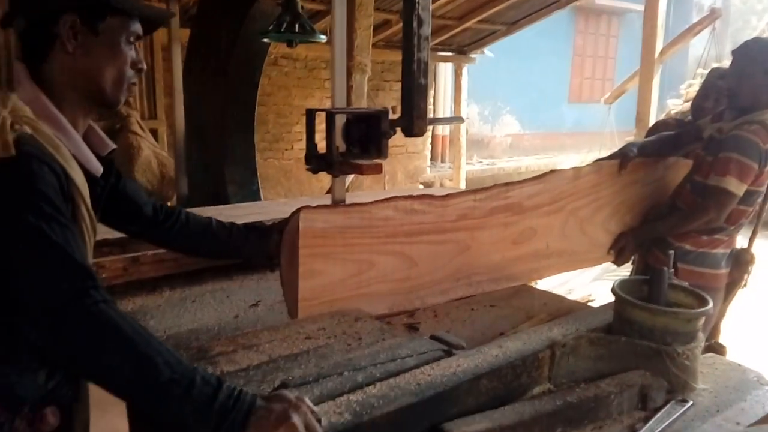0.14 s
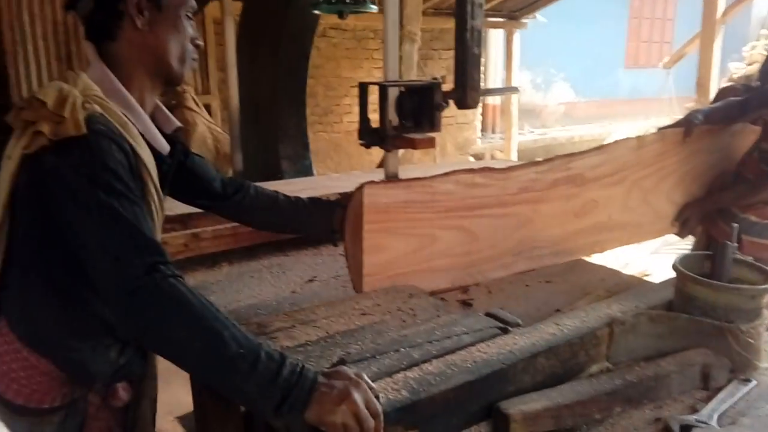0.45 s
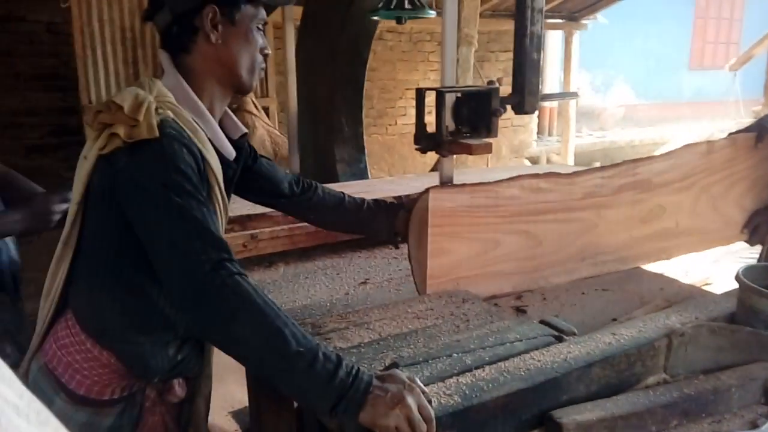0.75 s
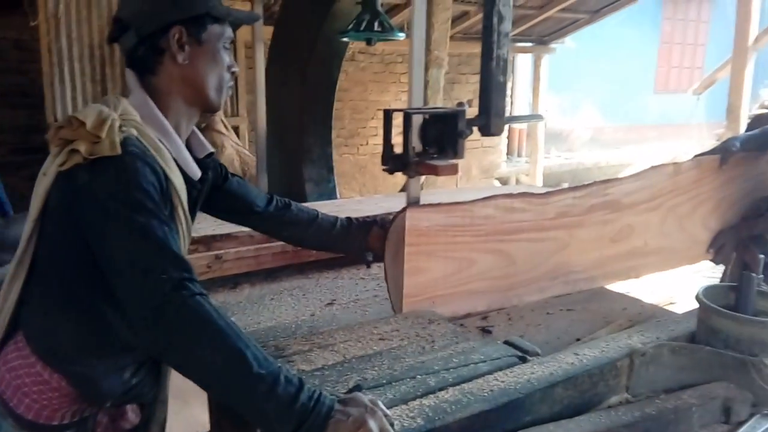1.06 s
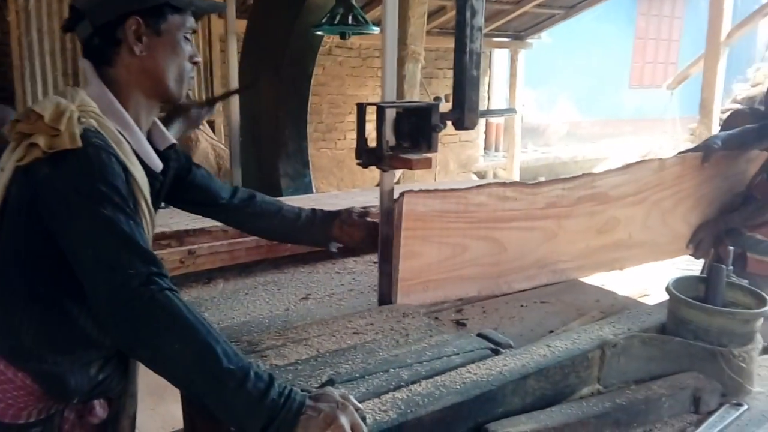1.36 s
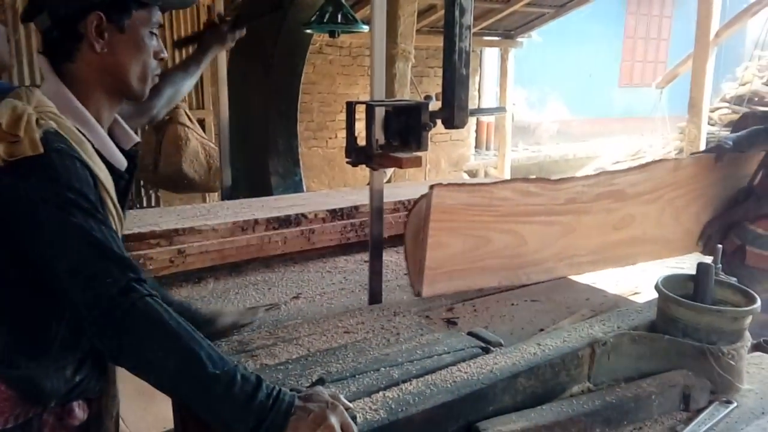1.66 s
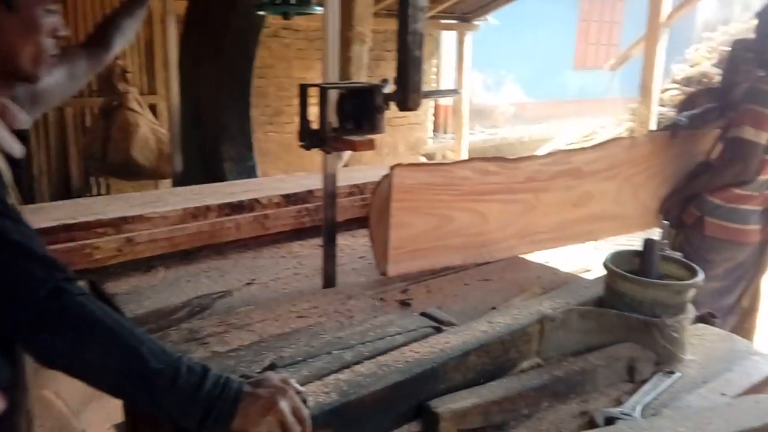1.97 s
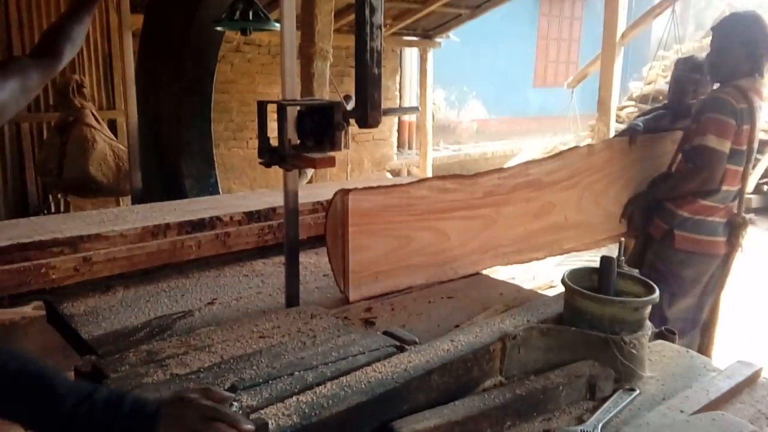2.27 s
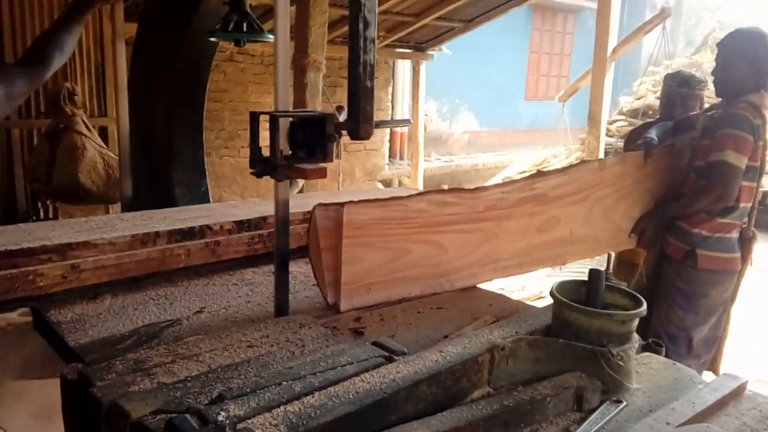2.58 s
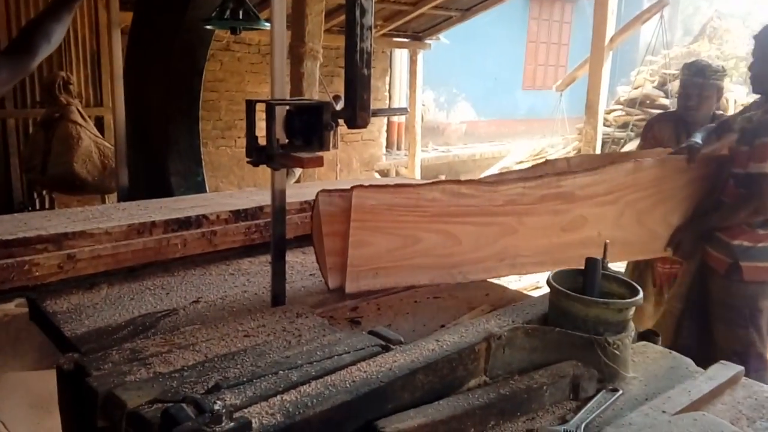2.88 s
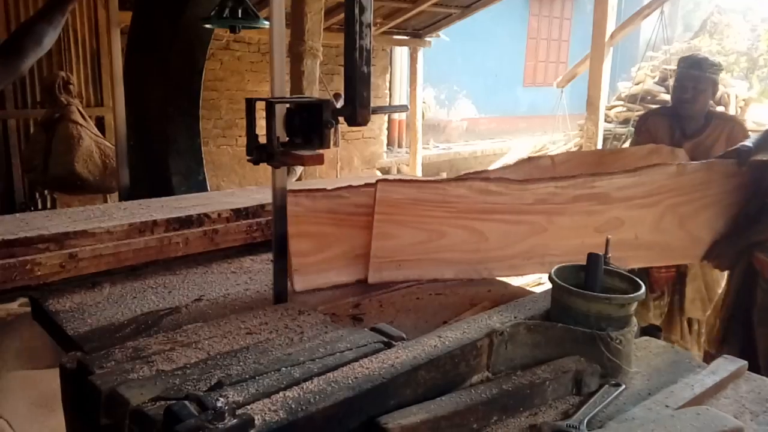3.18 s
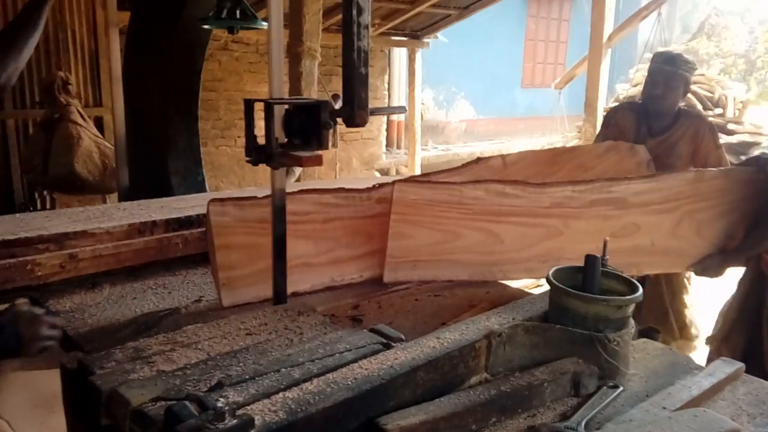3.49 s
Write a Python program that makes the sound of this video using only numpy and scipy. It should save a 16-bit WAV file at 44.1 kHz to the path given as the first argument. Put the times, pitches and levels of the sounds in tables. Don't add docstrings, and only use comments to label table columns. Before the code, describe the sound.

Big sawmill band saw roars and shrieks steadily, biting through wood until the blade pings free

```python
import sys
import numpy as np
from scipy import signal
from scipy.fft import rfft, irfft, next_fast_len
from scipy.io import wavfile
from scipy.ndimage import uniform_filter1d, map_coordinates

SR = 44100
rng = np.random.default_rng(int(sys.argv[2]) if len(sys.argv) > 2 else 0)


def boost(x):
    u = np.asarray(x, float) / 20
    return 10 ** u


def put_to_file(sound):
    columns = np.atleast_2d(sound).T
    safe = np.clip(columns, -1, 1)
    whole_steps = np.round(safe * 32767)
    wavfile.write(sys.argv[1], SR, whole_steps.astype(np.int16))


N = 160965

# t/s, level/dB
RUN = [
    (0, -15.5),
    (1.2, -15.5),
    (1.8, -15),
    (2.4, -16.5),
    (3.65, -14.5),
]
# lower edge f/Hz, edge sharpness f/Hz, reach upward f/Hz,
# steepness of the upper end, level/dB, sway level/dB
FAMILIES = [(478, 14, 170, 1.55, -23, 1), (1116.4, 16, 268, 4.4, -11.5, 0.5), (1810, 11, 340, 1.2, -19, 2),
            (2112, 53, 147, 1.6, -18.5, 3.5), (3287, 23, 640, 0.85, -2.5, 0.52),
            (4114, 25, 250, 3.8, -12.5, 1.5), (5260, 110, 690, 0.79, -12.5, 5),
            (6270, 170, 970, 1.2, -10.5, 0.1), (9150, 65, 550, 1.1, -28.5, 2)]
# f/Hz, width f/Hz, cutting level/dB, free level/dB
MODES_OF_BAND = [(301, 15, -58, -65.5), (411, 25, -59, -55), (945.4, 36, -44, -40.5),
                 (1276, 32, -33.5, -35), (1428, 8.5, -42, -53), (1851, 36, -41, -42),
                 (2210, 38, -40.5, -35.5), (2790, 19, -43, -43), (3380, 69, -46, -27), (3920, 40, -36, -28),
                 (5666, 60, -31, -43), (6230, 53, -39, -49), (6830, 45, -43, -47), (9080, 280, -42, -55)]
BAND_DB, MOST_SWAY_DB = -1, 1.3


def band():
    families = np.zeros(N)
    for edge_hz, sharp_hz, reach_hz, steep, db, sway_db in FAMILIES:
        def family_shape(f):
            rise = 1 / (1 + np.exp(np.clip((edge_hz - f) / sharp_hz, -40, 40)))
            return rise * np.exp(-(np.maximum(f - edge_hz, 0) / reach_hz) ** steep)
        level = boost(db + min(sway_db, MOST_SWAY_DB) * wobble(15))
        families += level * rough(family_shape)
    single = np.zeros(N)
    for hz, wide_hz, cut_db, free_db in MODES_OF_BAND:
        mode = rough(lambda f: 1 / (1 + (2 * (f - hz) / wide_hz) ** 2))
        single += by_load(cut_db, free_db) * mode
    vibration = boost(curve(RUN) + BAND_DB + 1.04 * wobble(16))
    return vibration * patchy(families, patchy_db=0.37) + single


# multiple of the tooth rate, cutting level/dB, free level/dB
TOOTH_ORDERS = [(1, -42.5, -45), (2, -32, -44)]
TOOTH_HZ, TOOTH_WANDER_HZ, TOOTH_SWAY_DB = 578.5, 2.2, 2.2


def tooth_tone():
    wander_hz = TOOTH_WANDER_HZ * (wobble(6) + wobble(30.55))
    lines = np.zeros(N)
    for multiple, cut_db, free_db in TOOTH_ORDERS:
        level = by_load(cut_db, free_db) * boost(TOOTH_SWAY_DB * wobble(9.04))
        lines += level * tone(TOOTH_HZ, wander_hz, multiple)
    return lines


# t/s, level/dB
BITE = [
    (0, -52.5),
    (.62, -49),
    (.75, -47),
    (1.28, -47),
    (1.34, -60),
    (1.7, -52.5),
    (2.25, -54),
    (2.35, -59),
    (2.45, -53),
    (3.65, -55.5),
]
# f/Hz, level/dB per Hz
GRIT = [(4000, -21), (7000, 0.5), (9000, -2), (10500, -9.5), (12700, -17), (13900, -15), (14700, -17),
        (15750, -17)]
GRIT_OVER_DB = 18.5


def grit():
    fine_grains = unit(uniform_filter1d(rng.standard_normal(N), size=60))
    grains = boost(2.2 * fine_grains + .7 * wobble(14) + .7 * wobble(58.5))
    hiss = rough(lambda f: boost(along(GRIT, f)), patchy_db=-1.0, drive=grains)
    return boost(curve(BITE) + GRIT_OVER_DB) * hiss


# t/s, peak level/dB
CHIPS = [
    (0.3754, -29),
    (0.7634, -34),
    (0.8634, -30),
    (1.2724, -26),
    (2.4204, -27),
    (3.4274, -28),
]
CHIP_T60_S, CHIP_HZ, CHIP_DB = .03, 8000, -4


def chips():
    t = np.arange(N) / SR
    flares = np.zeros(N)
    for s, db in CHIPS:
        flares += boost(db + CHIP_DB - 60 * np.maximum(t - s, 0) / CHIP_T60_S) * (t >= s)
    return flares * rough(lambda f: boost(along(GRIT, f)) / (1 + (CHIP_HZ / (f + 1)) ** 6))


# t/s, length t/s, level/dB
GROANS = [
    (.26, .1, -58),
    (.43, .13, -57),
    (.71, 0.31, -52),
    (1.057, 0.21, -57),
]
# t/s, level/dB
THUDS = [
    (.47, -56),
    (.9, -54),
    (1.1, -53),
]
GROAN_HZ, GROAN_EDGE_S = 149, 0.028
THUD_HZ, THUD_S = 105, 0.045


def slab():
    t = np.arange(N) / SR
    push = np.zeros(N)
    for s, length_s, db in GROANS:
        push += boost(db) * np.clip(np.minimum(t - s, s + length_s - t) / GROAN_EDGE_S, 0, 1)
    groan = push * boost(1.4 * wobble(11.4)) * tone(GROAN_HZ, 1.5 * wobble(9.5))
    rocking = sum(boost(db) * np.exp(-((t - s) / THUD_S) ** 2) for s, db in THUDS)
    return groan + rocking * tone(THUD_HZ, 8 * wobble(15))


PING_S, PING_HZ, PING_RISE_S, PING_T60_S, PING_DB = 1.345, 960, 0.034, 0.42, -16


def ping():
    since = np.maximum(np.arange(N) / SR - PING_S, 0)
    rise = 1 - np.exp(-(since / PING_RISE_S) ** 2)
    decay = boost(PING_DB - 60 * since / PING_T60_S)
    return decay * rise * np.sin(2 * np.pi * PING_HZ * since)


# f/Hz, level/dB per Hz
ROAR = [(220, -72), (450, -59.5), (800, -50.5), (1600, -48.5), (2200, -48.5), (3100, -47.5), (6300, -40.5),
        (8500, -57)]
# f/Hz, level/dB per Hz
HUM = [(25, -70), (50, -69.5), (90, -72.5), (120, -65.5), (170, -64.5), (220, -99.5), (400, -100)]
ROAR_DB, HUM_DB = -17.5, -61
WHINE_HZ, WHINE_WANDER_HZ, WHINE_CUT_DB, WHINE_FREE_DB = 489, 2.5, -48, -39
MAINS_HZ, MAINS_DB = 50, -71


def machine():
    run_db = curve(RUN)
    roar = boost(ROAR_DB + run_db - run_db.mean()) * rough(lambda f: boost(along(ROAR, f)), patchy_db=1.25)
    whine_level = by_load(WHINE_CUT_DB, WHINE_FREE_DB) * boost(1.9 * wobble(5.99))
    whine = whine_level * tone(WHINE_HZ, WHINE_WANDER_HZ * wobble(18))
    hum = boost(HUM_DB) * rough(lambda f: boost(along(HUM, f)), patchy_db=1.3)
    mains = boost(MAINS_DB) * tone(MAINS_HZ, np.zeros(N))
    return roar + whine + hum + mains


RIPPLE_DB, RIPPLE_HZ = 1.1, 22


def shed(x):
    knots = rng.standard_normal(3000)

    def comb(hz):
        ripple = map_coordinates(knots, [hz / RIPPLE_HZ])
        return boost(RIPPLE_DB * np.clip(hz / 1500, 0, 1) * ripple)
    return filtered(x, comb)


# t/s, share 0-1
LOAD = [
    (0, 1),
    (.7, 1),
    (1.25, 0.95),
    (1.33, 0.13),
    (3.65, 0.24),
]


def by_load(cutting_db, free_db):
    return boost(free_db + (cutting_db - free_db) * np.clip(curve(LOAD), 0, 1))


def tone(hz, wander_hz, multiple=1):
    return np.sqrt(2) * np.sin(2 * np.pi * multiple * np.cumsum(hz + wander_hz) / SR)


def rough(response, patchy_db=None, drive=1):
    x = rng.standard_normal(N) * drive
    if patchy_db is not None:
        x = patchy(x, patchy_db)
    return unit(filtered(x, response))


def patchy(x, patchy_db):
    z = signal.stft(x, nperseg=512)[2]
    field = uniform_filter1d(rng.standard_normal(z.shape), size=6, axis=0)
    field = uniform_filter1d(field, size=8, axis=1)
    return signal.istft(z * boost(patchy_db * unit(field)), nperseg=512)[1][:N]


def filtered(x, response):
    m = next_fast_len(N + 8192)
    return irfft(rfft(x, m) * response(np.fft.rfftfreq(m, 1 / SR)), m)[..., :N]


def wobble(rate):
    return map_coordinates(rng.standard_normal(400), [np.arange(N) * rate / SR])


def curve(rows):
    s, v = np.transpose(rows)
    return np.interp(np.arange(N) / SR, s, v)


def along(points, hz):
    f, v = np.transpose(points)
    octaves_out = np.abs(np.log2((hz + 1) / (np.clip(hz, f[0], f[-1]) + 1)))
    return np.interp(np.log(hz + 1), np.log(f + 1), v) - 30 * octaves_out


def unit(x):
    return x / np.sqrt(np.mean(x ** 2) + 1e-20)


def scene():
    mono = shed(band() + tooth_tone() + grit() + chips() + slab() + ping() + machine())
    return np.array([mono, mono])


GAIN_CONTROL_S, GAIN_CONTROL_SHARE = 0.13, 0.43


def levelled(x):
    power = np.abs(uniform_filter1d(x ** 2, int(GAIN_CONTROL_S * SR), axis=-1)) + 1e-9
    x = x * (power.mean() / power) ** (GAIN_CONTROL_SHARE / 2)
    return x / (1 + np.abs(x) ** 8) ** (1 / 8)


# f/Hz, width f/Hz, level/dB
MIC_DIPS = [(218, 40, -6), (9080, 170, 3), (13850, 600, -6), (14900, 600, 2.5)]
TOP_HZ = 15720


def microphone(x):
    def response(hz):
        bumps_db = sum(db * np.exp(-((hz - c) / w) ** 2) for c, w, db in MIC_DIPS)
        return boost(bumps_db - .3 * np.maximum(hz - TOP_HZ, 0))
    return filtered(x, response)


# t/s, from f/Hz, to f/Hz
FILLED = [
    (.1524, 4130, 5300),
    (1.592, 4600, 5850),
    (1.801, 5600, 7000),
    (1.801, 9600, 11100),
    (2.242, 4600, 7000),
    (3.194, 4130, 5300),
    (3.194, 6900, 9000),
    (3.194, 11800, 13800),
    (3.2406, 12400, 15720),
    (3.635, 8200, 9700),
]
PATCH_S = 1024 / 44100


def widened(x):
    t = np.arange(N) / SR
    for s, low_hz, high_hz in FILLED:
        part = filtered(x, lambda hz: (hz > low_hz) & (hz < high_hz))
        fade = np.sin(np.pi / 2 * np.cos(np.pi / 2 * np.clip((t - s) / PATCH_S, -1, 1)) ** 2)
        other = np.array([np.roll(part[0], 5000), np.roll(part[1], 9000)])
        x = x + (np.sqrt(np.abs(1 - fade ** 2)) - 1) * part + fade * other
    return x


def roll_off(x):
    return signal.sosfilt(signal.butter(12, 17090, fs=SR, output="sos"), x)


def record(dry):
    mix = widened(microphone(levelled(dry)))
    return roll_off(mix)


dry = scene()
out = record(dry)
put_to_file(out)
```